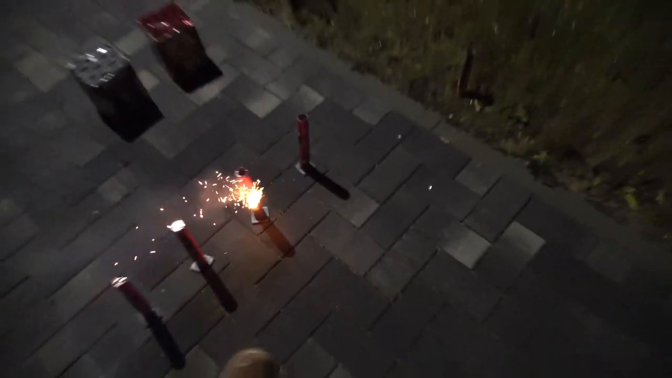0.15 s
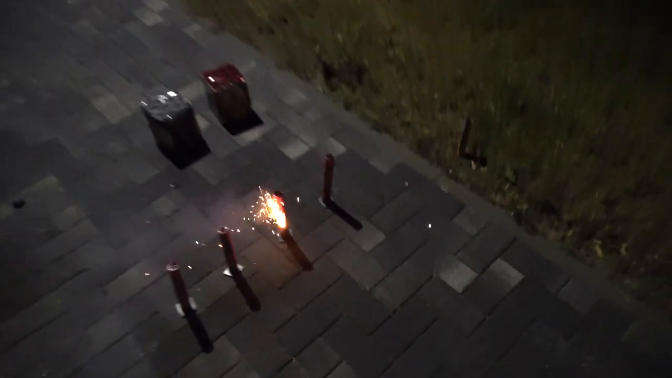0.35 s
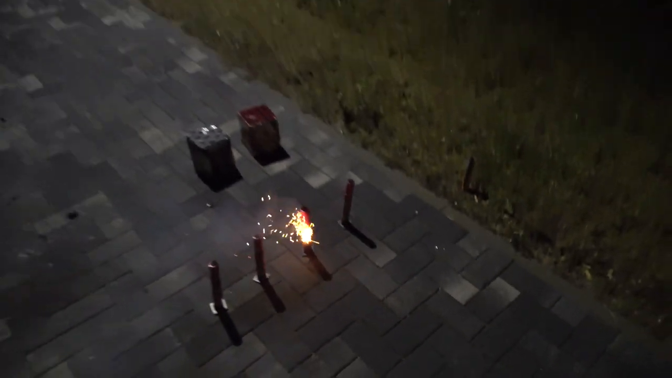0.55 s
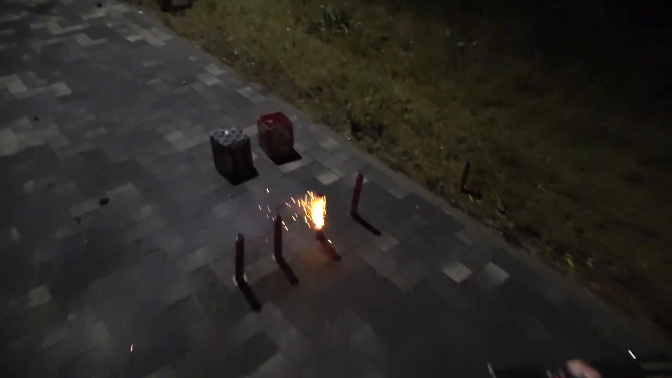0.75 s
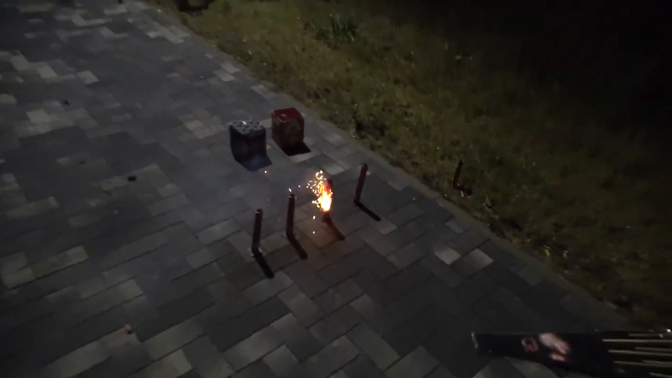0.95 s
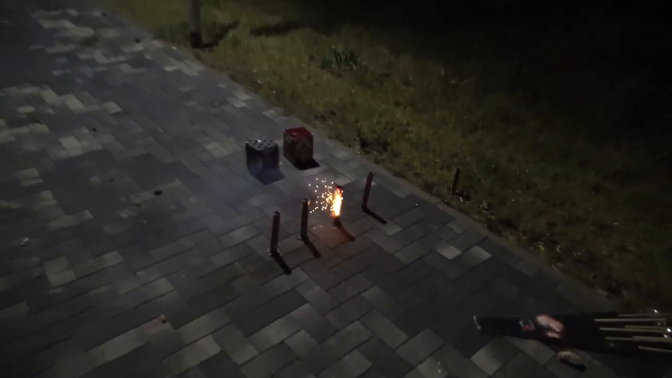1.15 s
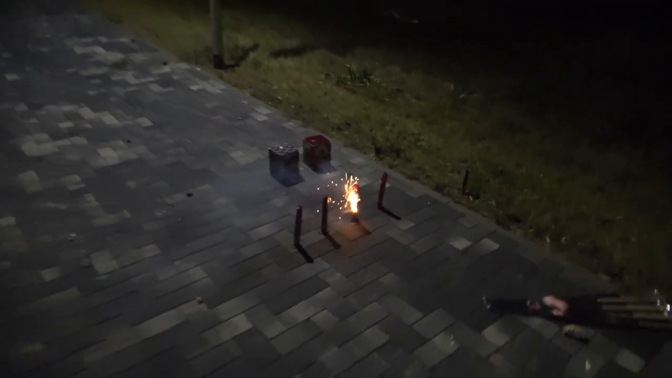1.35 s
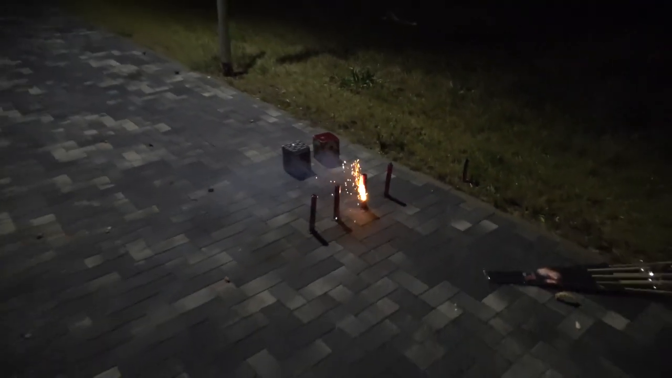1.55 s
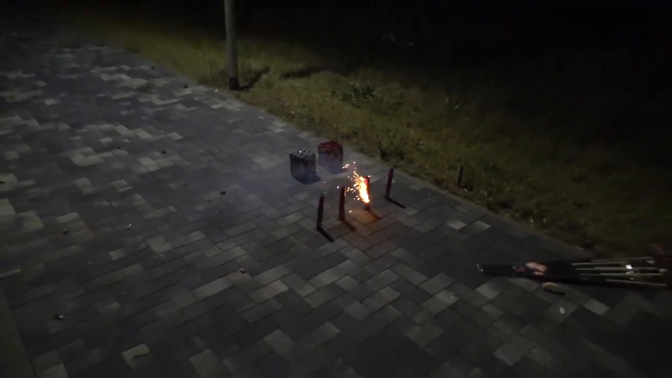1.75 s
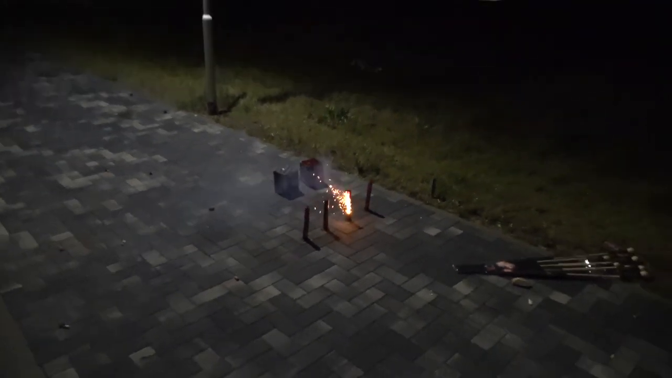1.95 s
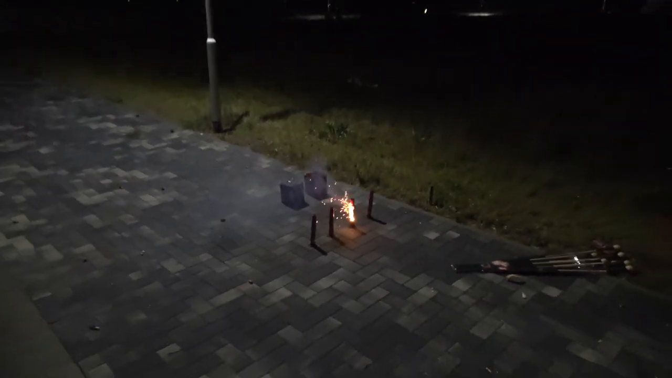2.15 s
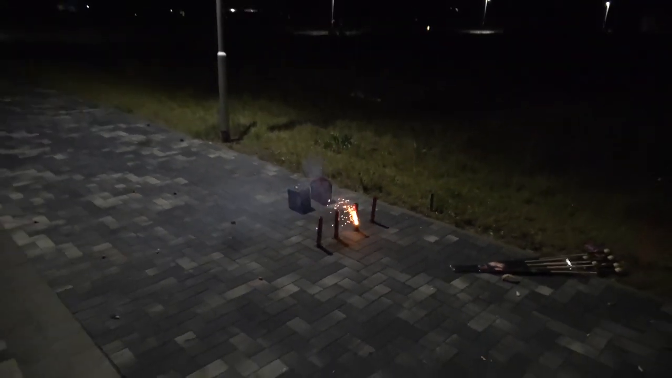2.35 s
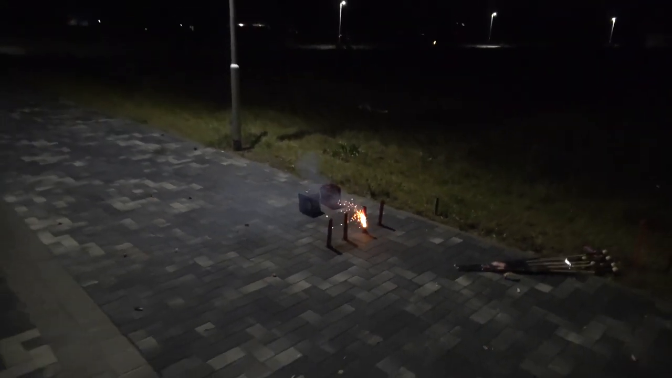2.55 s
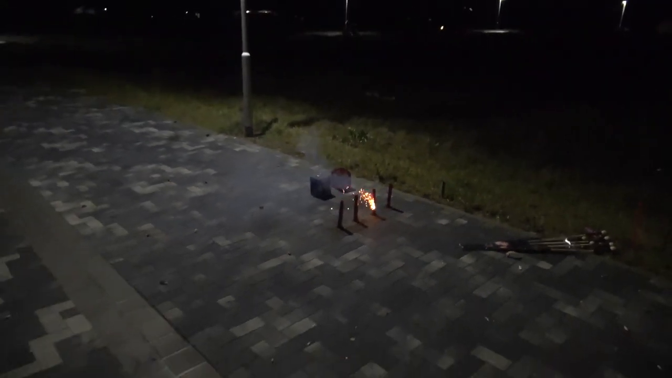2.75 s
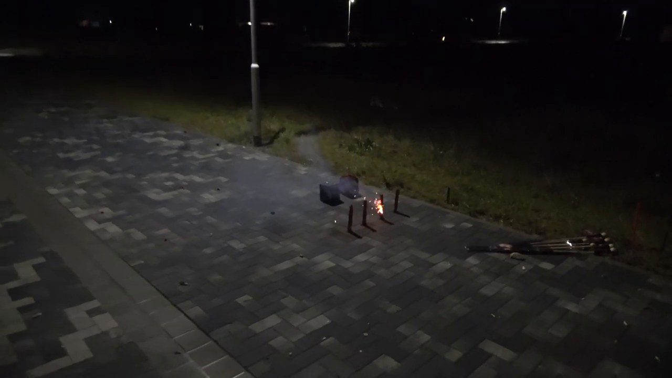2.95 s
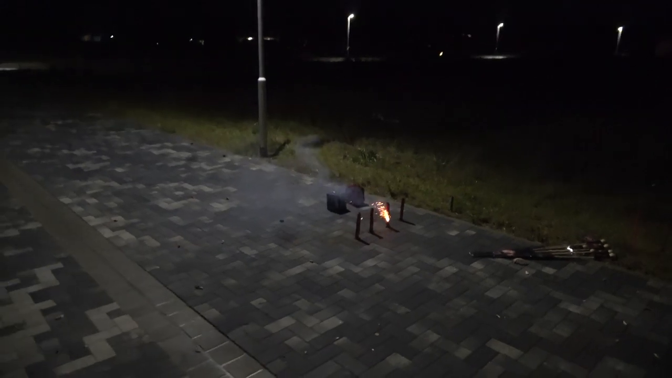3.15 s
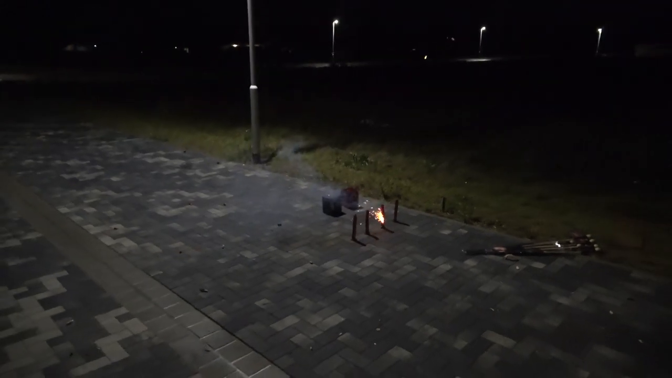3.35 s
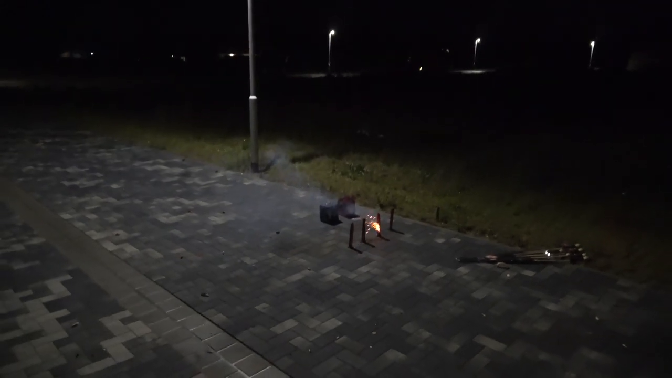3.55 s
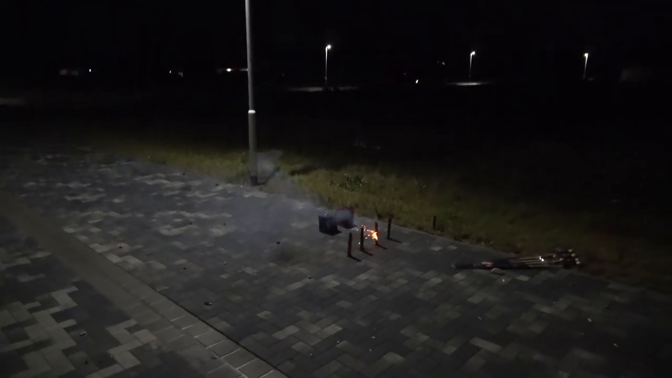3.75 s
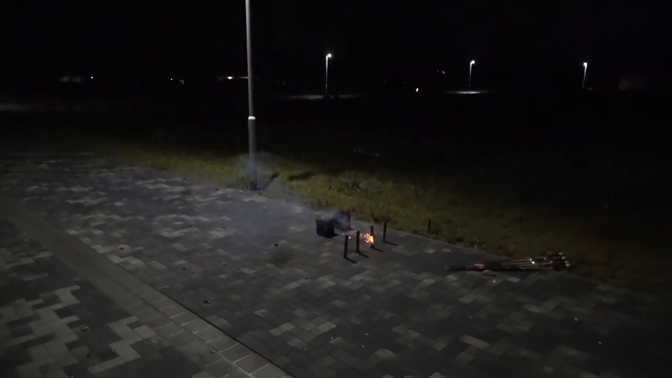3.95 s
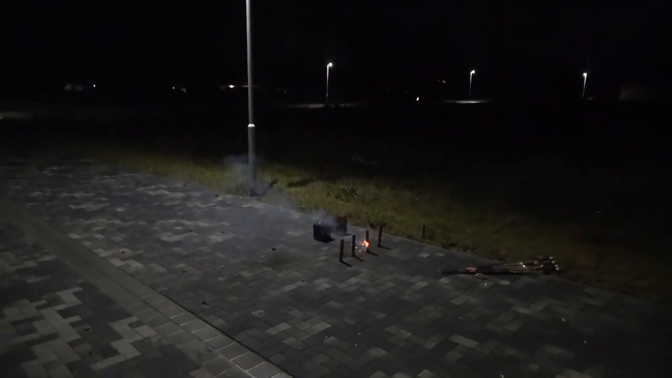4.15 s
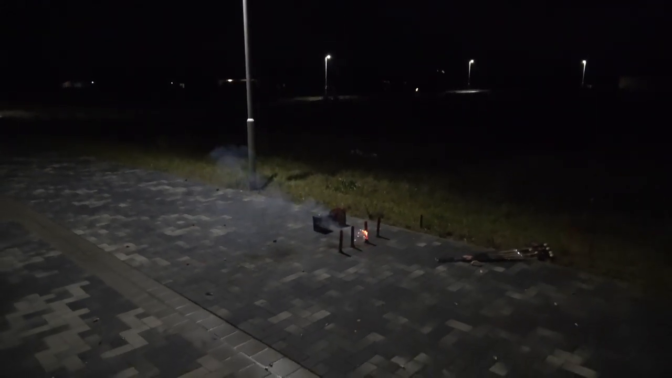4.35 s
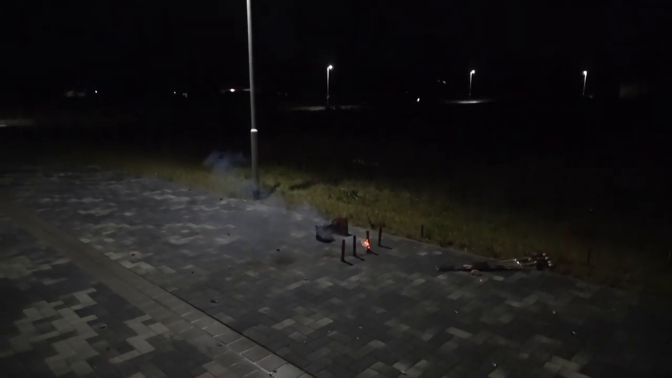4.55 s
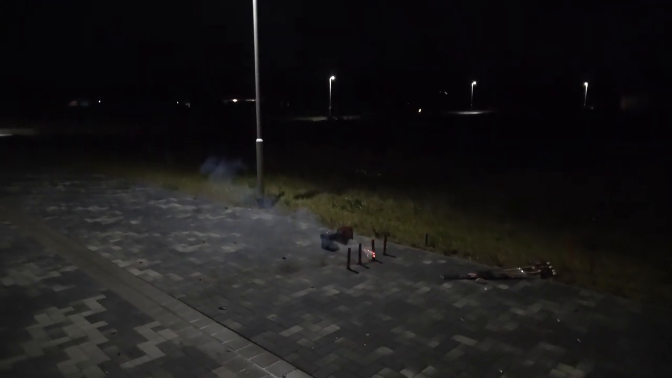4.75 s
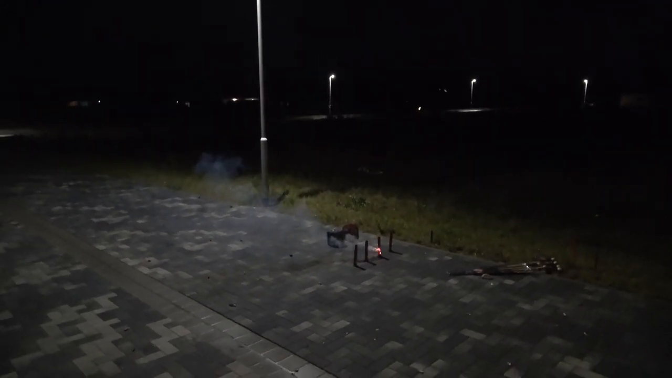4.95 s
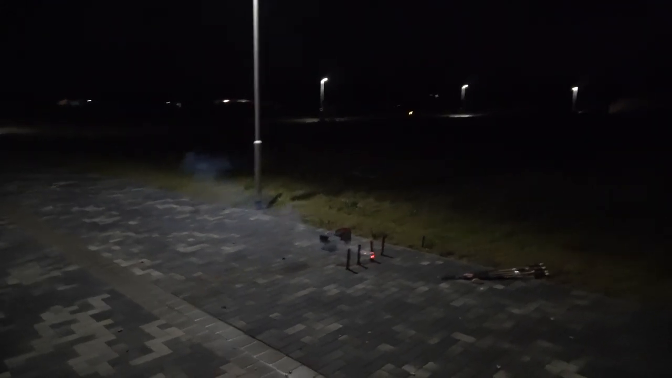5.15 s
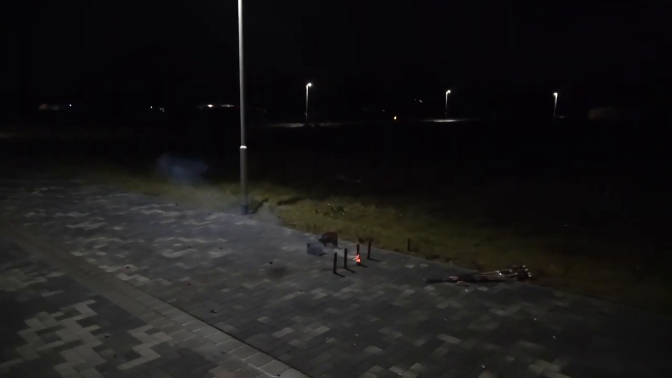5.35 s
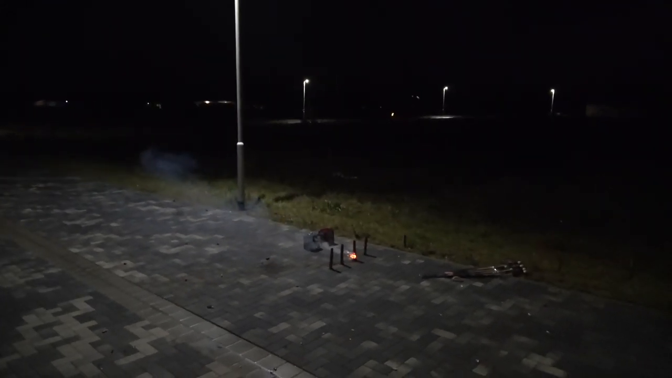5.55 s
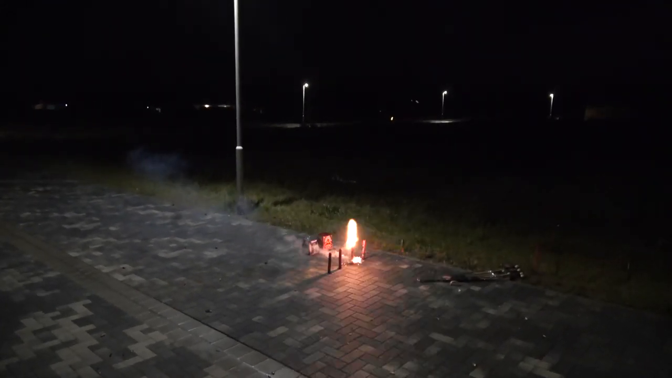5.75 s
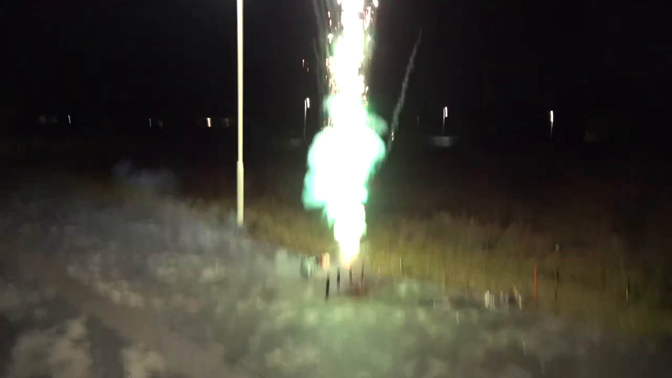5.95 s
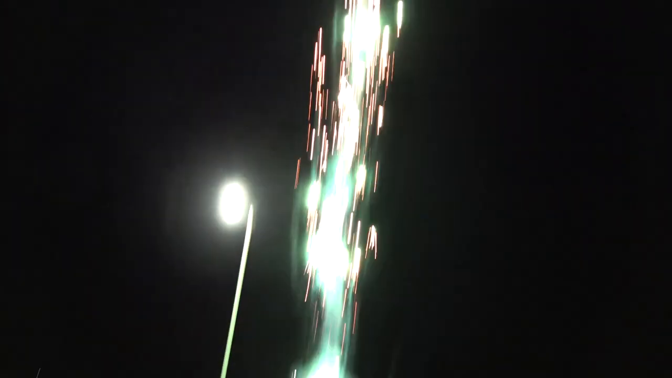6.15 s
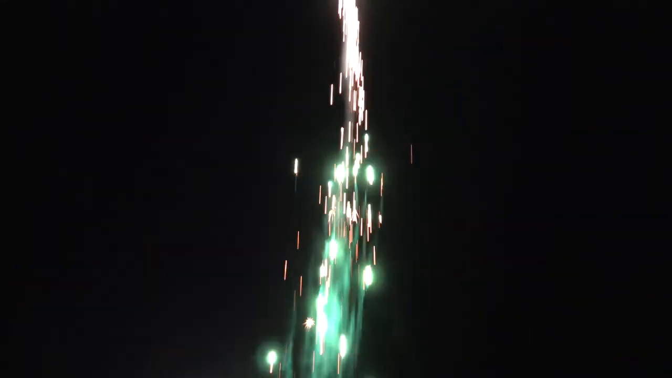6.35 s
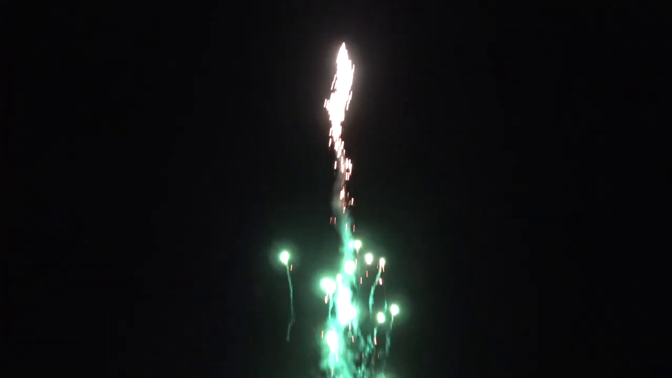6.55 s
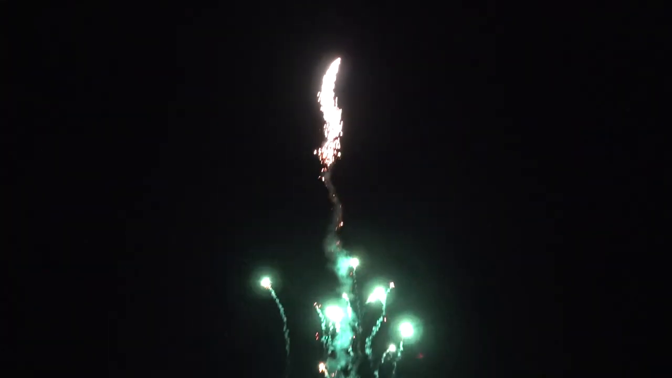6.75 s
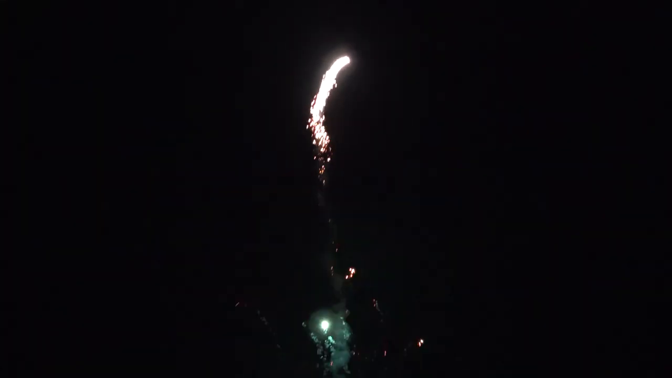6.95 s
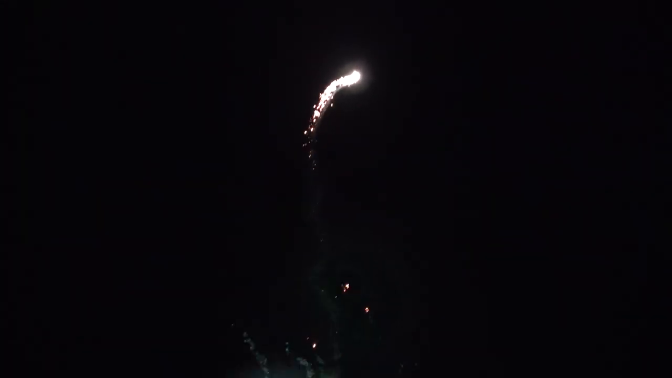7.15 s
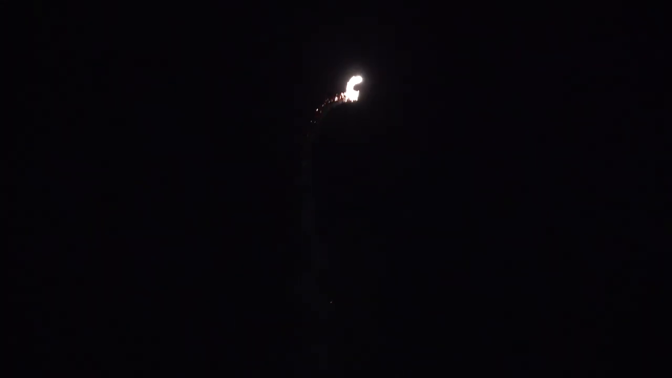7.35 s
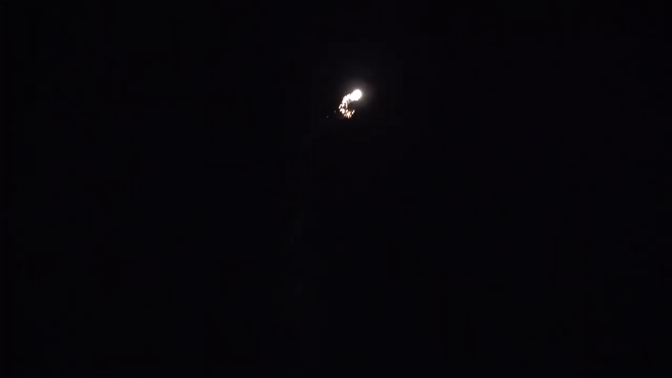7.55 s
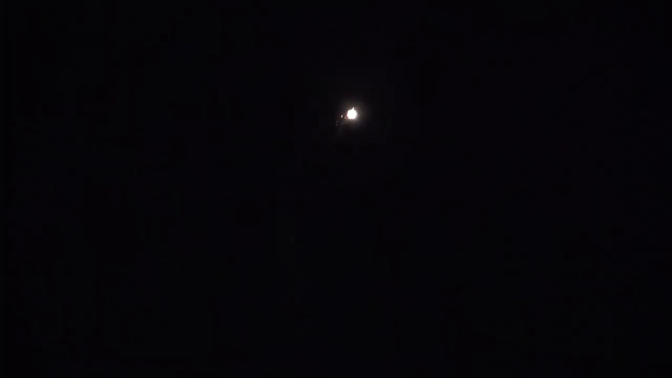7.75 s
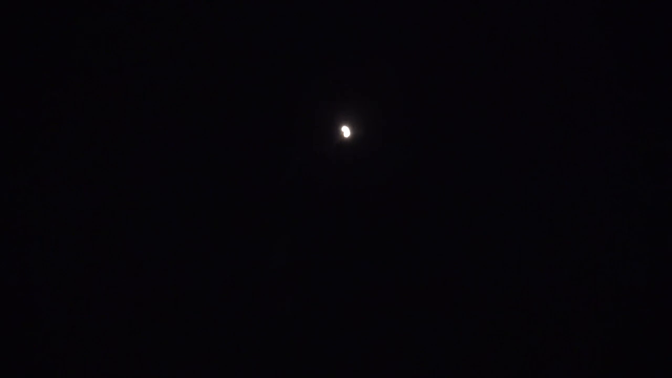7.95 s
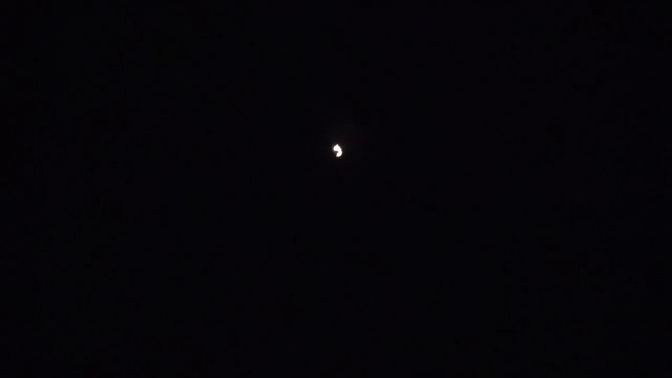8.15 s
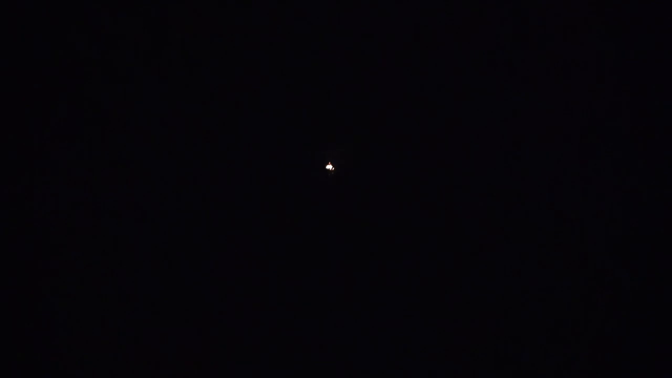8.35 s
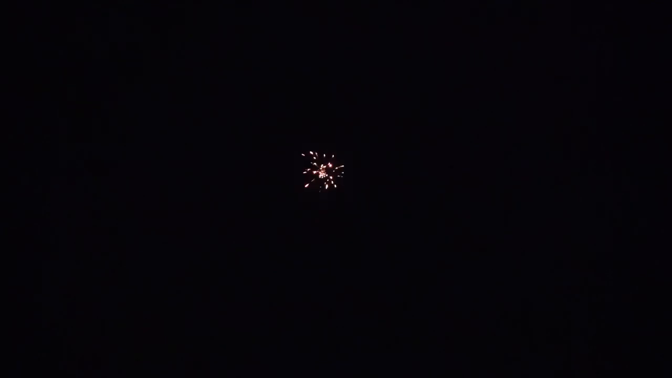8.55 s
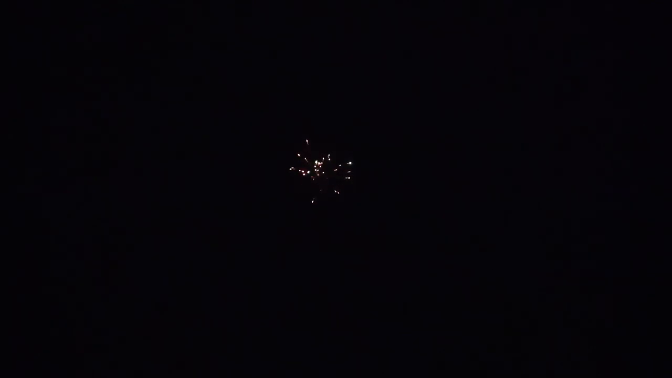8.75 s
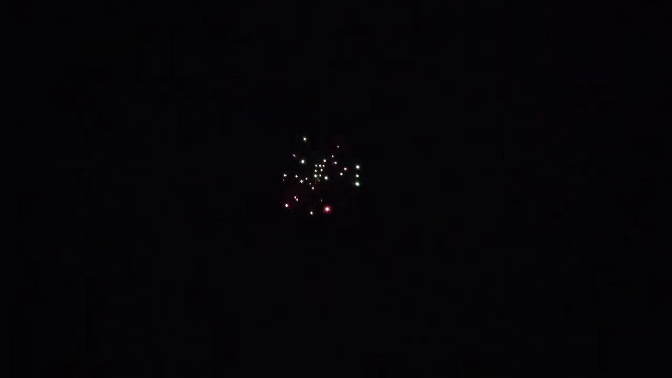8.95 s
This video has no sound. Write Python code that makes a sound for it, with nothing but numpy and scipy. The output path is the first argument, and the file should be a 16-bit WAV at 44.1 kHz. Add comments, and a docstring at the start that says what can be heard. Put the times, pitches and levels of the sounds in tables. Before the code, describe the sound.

A firework fuse hisses and sputters from the start, growing somewhat fainter as the microphone moves away. Gusts of wind rock the microphone with a low, uneven rumble, and soft footsteps thud on gritty paving, with a short scuff at about 5.4 seconds. At about 5.9 seconds the shell launches with a sharp crack and a brief roar, followed by quick popping echoes and a short high squeal. From about 6.2 seconds a loud, raspy howling whistle takes over, sagging in pitch, wavering and growing duller as the shell climbs. It ends with a small squeak at about 8.2 seconds, and a faint echo of the howl lingers while a few sparks snap. At about 8.9 seconds the shell bursts with a very loud, sharp bang, and echoes roll back from the open surroundings.

```python
"""A paved spot on a windy night: a firework's fuse sizzles in its mortar tube while a walker backs away.
The lift charge cracks and the shell howls upward, as burning powder makes its whistle tube sound
a low and a high tone. Sparks snap, the shell bursts, and far surroundings send back the howl and
both blasts as echoes. Gusts rock the microphone and add a low rumble."""
import sys
import numpy as np
from scipy import signal
from scipy.fft import rfft, irfft
from scipy.io import wavfile
from scipy.ndimage import uniform_filter1d, map_coordinates

SR = 44100
rng = np.random.default_rng(int(sys.argv[2]) if len(sys.argv) > 2 else 0)


def int16_out(signal):
    """Quantize to a 16-bit WAV file."""
    q = np.round(np.clip(np.atleast_2d(signal).T, -1, 1) * 32767)
    wavfile.write(sys.argv[1], SR, q.astype(np.int16))


N = 400869
T = np.arange(N) / SR

# the dull rush of night air and far echoes: pitch_hz, level_db
AIR_TONE = [(80, -9), (200, 0), (500, 3.5), (1200, -0.5), (2500, -9), (4000, -12.5), (9000, -35)]
# the rasp of the whistle's flame: pitch_hz, level_db
RASP_TONE = [(300, -27), (800, 12), (1600, -2.5), (4000, -8), (6000, -62.5)]


def undb(db):
    """Turns decibels into a number to multiply by."""
    return 10 ** (np.asarray(db) / 20)


def curve(table, column, outside=None):
    """Joins one column's points with straight lines over time; column 0 holds the seconds."""
    rows = np.array(table, float)
    return np.interp(T, rows[:, 0], rows[:, column], outside, outside)


def colour(x, tone):
    """Makes some pitches louder than others by (pitch_hz, level_db) rows; the result has spread 1."""
    hz, db = np.transpose(tone)
    bin_hz = np.maximum(np.arange(N // 2 + 1) * SR / N, 1)
    shaped = irfft(rfft(x) * undb(np.interp(np.log(bin_hz), np.log(hz), db, -90, db[-1])), N)
    return shaped / shaped.std()


def wander(rate):
    """A smooth random wiggle that changes about rate times a second; spread 1."""
    width = max(int(SR / rate), 2)
    smooth = uniform_filter1d(uniform_filter1d(rng.standard_normal(N), width), width)
    return smooth / smooth.std()


def crackle(spread_db):
    """Noise made of tiny clicks, a few much louder than the rest."""
    return rng.standard_normal(N) * undb(spread_db * np.minimum(rng.exponential(size=N), 5.5))


def swells(table):
    """Smooth bumps of loudness from (centre_s, peak_db, length_s) rows."""
    return sum(undb(db) * np.cos(np.pi * np.clip((T - s) / length, -.5, .5)) ** 2
               for s, db, length in table)


def phase(hz, wobble, rate=90):
    """The running angle of an unsteady tone; wobble is a share of its pitch."""
    return 2 * np.pi * np.cumsum(hz * (1 + wobble * wander(rate))) / SR


def add_hit(out, start_s, db, hz, rise_ms, fade_ms, noise_db=-60):
    """Adds a short tone with a spray of noise; both drop 60 dB in fade_ms."""
    start = int(start_s * SR)
    t = np.arange(min(2000, N - start)) / SR
    shape = (1 - np.exp(-t * 1000 / rise_ms)) ** 2 * undb(-60 * t * 1000 / fade_ms)
    spray = undb(noise_db) * rng.standard_normal(2000)[:len(t)]
    out[start:start + len(t)] += undb(db) * shape * (np.sin(2 * np.pi * hz * t) + spray)


def wind():
    """Swirls of air rock the microphone at a wandering rate, over a gusty rumble and the night air."""
    levels = [(0, -13, -23, -27.5), (.6, -13, -27, -30.5), (1.1, -19.5, -17.5, -29.5),
              (1.35, -27, -22.5, -30.5), (1.8, -18, -30, -27.5), (2.5, -18, -26, -32.5),
              (2.9, -16.5, -35, -33.5), (3.7, -21.5, -34.5, -38.5), (4.3, -13.5, -31, -37.5),
              (4.7, -13.5, -33, -35.5), (5.2, -14, -26, -34), (5.8, -12.5, -29.5, -37),
              (6.1, -29, -33, -34), (6.4, -40, -52, -38.5), (6.8, -38, -58.5, -37.5),
              (7.6, -30, -51.5, -37), (7.9, -33, -40.5, -34), (8.4, -24, -41, -34.5),
              (8.8, -23.5, -47, -43.5), (9.09, -29, -23, -36)]  # the wind's layers: time_s, sway_db, rumble_db, air_db
    gusts = [(.1, 1, 0.24), (.71, -6, 0.23), (.98, -6.5, 0.38), (1.32, -10, 0.12), (1.48, -9.5, 0.49),
             (2.07, -2, 0.34), (2.3, -10.5, 0.26), (2.58, -17, 0.035), (2.8, -10.5, 0.65),
             (3.37, -7.5, 0.59), (3.88, -9.5, 0.14), (4.27, -9, 0.16), (4.6, -27, 0.21), (5.1, -5, .4),
             (5.27, 0.5, 0.29), (5.6, -5.5, 0.25), (5.77, -8.5, .2), (6.08, -13, 0.11), (7.62, -26, 0.18),
             (8.08, -15, 0.18), (8.23, -12, 0.13), (8.38, -11.5, 0.34), (8.62, -12.5, 0.34),
             (8.77, -18, 0.18)]  # single puffs: centre_s, peak_db, length_s
    sway_tone = [(4, -23.5), (9, 2), (16, 4.5), (26, -9), (40, -34), (80, -73)]  # slow swings of air pressure: pitch_hz, level_db
    rumble_tone = [(20, 17.5), (35, 13.5), (60, 1.5), (120, -7), (250, -14), (600, -49)]  # the deep rumble: pitch_hz, level_db
    gust_gain = swells(gusts)
    swirl_hz = 12 * np.exp(0.37 * np.clip(wander(8.95), -1.5, 1.5))
    swirls = np.sin(2 * np.pi * np.cumsum(swirl_hz) / SR) * gust_gain
    sway = colour(rng.standard_normal(N), sway_tone) * undb(curve(levels, 1))
    rumble_gain = undb(curve(levels, 2)) + undb(-35) * gust_gain
    rumble = colour(rng.standard_normal(N), rumble_tone) * rumble_gain * undb(4.4 * wander(16))
    air = colour(rng.standard_normal(N), AIR_TONE) * undb(curve(levels, 3) + 1.44 * wander(9.5))
    return swirls + sway + rumble + air


def far_blasts():
    """Both blasts come back from far away as a dull rush that swells and dies."""
    echoes = [(6.0, -13, 0.15, 0.39), (9.09, -12.5, 0.24, .5)]  # one rush per blast: peak_s, peak_db, rise_s, fade_s (to drop 60 dB)
    gain = sum(undb(db - 60 * np.maximum(T - s, 0) / fade) * np.clip(1 + (T - s) / rise, 0, 1) ** 2
               for s, db, rise, fade in echoes)
    return colour(rng.standard_normal(N), AIR_TONE) * gain


def far_whistle():
    """The howl returns along many paths that add up by chance, so each of its tones flutters."""
    echo = [(8.2, 974, -23), (8.24, 866, -24), (8.46, 900, -28), (8.7, 901, -31.5), (8.87, 902, -37.5),
            (8.9, 885, -45)]  # the returning howl: time_s, pitch_hz, level_db
    harmonics = [(1, 1.5), (2, -19), (3, -14.5), (4, -25.5)]  # its tones: pitch_multiple, level_db
    angle = phase(curve(echo, 1), wobble=0.01)
    tones = sum(undb(db) * (wander(90 * k) * np.sin(k * angle) + wander(90 * k) * np.cos(k * angle))
                for k, db in harmonics)
    hiss = colour(rng.standard_normal(N), RASP_TONE) * undb(np.interp(T, [8.2, 8.5, 8.9], [-8, -12, -16]))
    return (tones + hiss) * undb(curve(echo, 2, -120))


def feet():
    """Soles thud on gritty paving, and one drags in nine quick slips."""
    steps = [(.063, -3, 153, -36), (.173, -1.5, 312, -22.5), (0.268, -5, 265, -16.5),
             (0.711, 1, 296, -28.5), (0.73, 1, 280, -26), (0.869, -2.5, 273, -18.5),
             (1.019, -20.5, 151, -12.5), (1.269, 0.5, 230, -35), (1.315, -2.5, 517, -48),
             (1.418, -8.5, 207, -33.5), (1.826, 5.5, 242, -36), (1.981, -6, 144, -18),
             (2.415, -7, 198, -36), (3.109, 1, 185, -34), (3.339, -9.5, 166, -43.5),
             (3.936, -8.5, 158, -29), (4.304, -14.5, 147, -12), (4.747, -5.5, 270, -29),
             (4.79, -10.5, 239, -21), (5.077, -12, 155, -18)]  # footfalls: start_s, level_db, pitch_hz, grit_offset_db
    grit_tone = [(200, -4.5), (700, -3), (1500, -7.5), (3500, -18), (8000, -31.5)]  # crunching grit: pitch_hz, level_db
    soles, grit = np.zeros(N), np.zeros(N)
    for s, db, hz, grit_db in steps:
        add_hit(soles, s, db, hz, rise_ms=0.89, fade_ms=18)
        add_hit(grit, s, db + grit_db, 0, rise_ms=5.1, fade_ms=45, noise_db=19)
    scuff_s, slip_gap_s, slip_hz = 5.354, .0038, 1620
    for k, (late, size, pitch) in enumerate(rng.standard_normal(size=(9, 3))):
        s, db = scuff_s + slip_gap_s * (k + .15 * late), -2.5 + 2.2 * size
        add_hit(soles, s, db, slip_hz * (1 + .08 * pitch), rise_ms=0.02, fade_ms=8.9)
        add_hit(soles, s, db - 12, 700, rise_ms=0.038, fade_ms=7.9)
        add_hit(grit, s, db - 6, 0, rise_ms=0.086, fade_ms=21, noise_db=-2.5)
    return soles + colour(grit, grit_tone) * grit.std()


def delayed(x, ms):
    """The same sound, ms milliseconds later."""
    return map_coordinates(x, [np.arange(N) - ms * SR / 1000], order=3, mode="nearest")


def fuse():
    """A sputtering hiss; the paving's echo cancels some pitches, which climb as the walker backs off."""
    burn = [(0, -16, 0.56, 0), (.3, -20, 0.5, 0), (.6, -20.5, 0.45, 4), (.9, -20, 0.38, 1.5),
            (1.2, -23, 0.34, 4), (1.5, -20.5, 0.29, 1.5), (1.8, -22, 0.26, 1), (2.1, -24.5, 0.23, 0),
            (2.4, -25, 0.21, 2), (3.0, -24.5, .185, 3.1), (3.3, -21, 0.18, 3), (3.9, -26, 0.18, 2.3),
            (4.1, -28, .15, -3), (4.4, -28.5, 0.14, -2.5), (4.7, -27.5, 0.13, 2.3), (5.3, -25, .11, -7.5),
            (5.6, -23.5, 0.097, -9), (5.86, -26.5, 0.083, 5), (5.9, -19, 0.16, 10)]  # the burning fuse: time_s, level_db, echo_delay_ms, treble_db
    hiss_tone = [(300, -27), (800, -10), (2000, -0.5), (4300, 1), (6400, -5), (8400, 2.5), (10300, -12.5),
                 (13000, -6.5), (15500, -13)]  # its hiss: pitch_hz, level_db
    paving = [(.11, .85, 0.54), (.14, .85, 0.13), (.2, 0.86, .3), (.3, 0.9, 0.42), (.5, 0.7, 0.2)]  # how much bounces back: echo_delay_ms, dull_share, treble_share
    hiss = colour(crackle(2.34) * undb(1.16 * wander(10.3) + 0.88 * wander(53)), hiss_tone)
    dull = uniform_filter1d(uniform_filter1d(hiss, size=3), size=3)
    treble = hiss - dull
    delay_ms = curve(burn, 2)
    ms, dull_share, treble_share = np.transpose(paving)
    dull_echo = np.interp(delay_ms, ms, dull_share) * delayed(dull, delay_ms)
    # the treble bounces off the tops of the stones, a little sooner
    treble_echo = np.interp(delay_ms, ms, treble_share) * delayed(treble, delay_ms - 0.028)
    return (dull + dull_echo + (treble + treble_echo) * undb(curve(burn, 3))) * undb(curve(burn, 1, -120))


def lift():
    """The lift charge roars out of the tube in lumps; nearby walls slap it back as pops."""
    blast = [(5.868, -10), (5.872, -9), (5.875, -2), (5.885, 13), (5.892, -11), (5.925, -17),
             (5.975, -10.5), (6.015, -13), (6.025, -23), (6.062, -21), (6.076, -13.5), (6.09, -22),
             (6.3, -36.5), (6.5, -39)]  # the crack and its roar: time_s, level_db
    roar_tone = [(35, -42), (60, -8), (248, 4), (359, -6), (585, -4.5), (1260, -6), (1480, -3.5),
                 (2910, -8), (3420, -5), (15500, -25.5)]  # the roar: pitch_hz, level_db
    slaps = [(5.903, 3, 720), (5.978, 13, 1540), (5.99, 5, 970), (6.01, 12, 1110), (6.015, 9, 1440),
             (6.039, 7, 993), (6.068, 3, 1370), (6.073, 3, 2600), (6.08, 2, 1470), (6.109, -11, 1170),
             (6.134, -11, 1160), (6.162, -9, 648), (6.17, -6, 1200), (6.202, -17, 258), (6.223, -1, 1240)]  # wall echoes: start_s, level_db, pitch_hz
    pops = np.zeros(N)
    for s, db, hz in slaps:
        add_hit(pops, s, db, hz, rise_ms=0.038, fade_ms=6.7, noise_db=-15)
    roar = colour(crackle(2.6), roar_tone) * undb(curve(blast, 1, -120) + 3.2 * wander(150))
    return roar + uniform_filter1d(pops, size=3)


def burst():
    """Sparks snap, then come the shell's bang, its bounce off the ground and a roll of echoes."""
    sparks = [(8.3644, -25), (8.4692, -18), (8.485, -8), (8.6273, -26), (8.6532, -24), (8.7121, -28),
              (8.767, -18), (8.8009, -20), (8.8348, -21)]  # snaps: start_s, level_db
    # the bang and its bounce: start_s, level_db, pitch_factor, base_hz, rise_ms, fade_ms
    bangs = [(8.8702, 48, -0.863, 537, 0.046, 3.4), (8.8829, 43, 0.98, 520, 2, 3.1)]
    sharp_echoes = [(8.9254, 9, -0.96, 370), (8.9428, 6, 0.72, 525), (8.9666, 7, 0.85, 450),
                    (8.972, -2, 0.89, 513), (9.016, 3, 1, 350)]  # knocks in the roll: start_s, level_db, pitch_factor, base_hz
    roll = [(8.872, -25), (8.89, -28), (8.93, -11), (9.0, -14.5), (9.09, -21)]  # rolling echoes: time_s, level_db
    roll_tone = [(40, -25), (130, -11), (400, -4.5), (700, -6.5), (1200, -21.5), (2500, -16.5), (3500, -27),
                 (5500, -25.5), (8000, -32.5), (15500, -62)]  # their sound: pitch_hz, level_db
    hits = np.zeros(N)
    for s, db in sparks:
        add_hit(hits, s, db, 4000, rise_ms=0.041, fade_ms=0.51)
    # a negative factor turns the wave upside down
    for s, db, factor, hz in sharp_echoes:
        add_hit(hits, s, db, factor * hz, rise_ms=0.33, fade_ms=15)
    for s, db, factor, hz, rise_ms, fade_ms in bangs:
        add_hit(hits, s, db, factor * hz, rise_ms, fade_ms)
    return hits + colour(crackle(4), roll_tone) * undb(curve(roll, 1, -120) + 2 * wander(89))


def flame_noise(roughness, bright_db, fading_s):
    """The whistle's flame rasps more as it burns rougher, and its jet of gas hisses."""
    jet_tone = [(3000, 0), (5000, -5), (8400, -7.5), (10300, -25), (15000, -25)]  # the jet's hiss: pitch_hz, level_db
    rasp_db = np.interp(roughness, [0, 1], [-33.5, -15]) + 0.26 * np.clip(bright_db, -7, 0)
    rasp = colour(crackle(3.9) * undb(0.87 * wander(27)), RASP_TONE) * undb(rasp_db)
    jet_db = -28.5 + 1.7 * roughness * np.maximum(bright_db, -7) - 14 * fading_s
    jet = colour(crackle(3.9) * undb(1.6 * wander(22)), jet_tone) * undb(jet_db)
    # the air soaks up the treble as the shell climbs
    dull = uniform_filter1d(jet, size=4)
    return rasp + dull + (jet - dull) * undb(np.interp(T, [6.5, 8.2], [0, -14]))


def squeal(low, low_gain):
    """The tube's high tone; it mixes with the low one to make tones at their sum and difference."""
    squeals = [
        [(5.9, 3650, -34), (5.92, 3500, -1), (5.94, 3530, -22), (5.975, 3395, -11), (5.995, 3325, -28),
         (6.035, 3350, -24), (6.052, 3305, -7), (6.092, 3245, -1), (6.184, 3224, 0), (6.28, 3260, -16.5),
         (6.32, 3160, -30)],
        [(8.18, 2910, -32), (8.202, 2816, -13.5), (8.238, 2804, -17), (8.262, 2815, -27)],
    ]  # one table for the start, one for burnout: time_s, pitch_hz, level_db
    # the ground returns the climbing shell's squeal at a slightly lower pitch, so it throbs
    throb_hz, dip_s = 36, 6.14
    echo = np.interp(T, [6.075, 6.095, 6.19, 6.23], [0, .85, .85, 0])
    throb = np.abs(1 - echo * np.exp(2j * np.pi * throb_hz * (T - dip_s))) / (1 + echo)
    stutter_db = np.interp(T, [5.99, 6.08], [3.5, .7])  # the flame catches unevenly at first
    wobble = np.interp(T, [5.98, 6.05], [.035, .0015])
    mix_gain = low_gain * np.interp(T, [6.4, 8.1], [1, .3])  # steep wave fronts fade with height
    out = np.zeros(N)
    for table in squeals:
        high = phase(curve(table, 1), wobble, rate=350)
        gain = undb(curve(table, 2, -120) + stutter_db * wander(160)) * throb
        mixed = (undb(-6) * np.sin(high + low) + undb(-9) * np.sin(high - low)
                 + undb(-14) * np.sin(high + 2 * low))
        out += gain * (np.sin(high) + undb(-24) * np.cos(2 * high) * echo + mix_gain * mixed)
    return out


def whistle():
    """Burning powder drives the open tube: a low howl with overtones, flame noise and a high squeal."""
    howl = [(6.17, 1180, 9), (6.2, 1150, -26), (6.29, 1162, -21), (6.32, 1093, -7), (6.415, 968, -5),
            (6.43, 913, -0.3), (6.46, 936, 0), (6.5, 893, 2.5), (6.58, 868, 1.7), (6.72, 840, 3.5),
            (6.87, 843, 2.5), (6.9, 821, 5), (7.09, 818.6, 2.5), (7.22, 812, 3), (7.27, 833, 1.4),
            (7.39, 824, 2), (7.41, 799, 6.5), (7.52, 789, 7), (7.71, 825, 3), (7.86, 788.5, 5.2),
            (7.91, 832, 1.5), (7.98, 836, 0.5), (8.06, 868, -1), (8.13, 857.5, -2.5), (8.155, 888, -2.5),
            (8.17, 983, -15), (8.21, 994, -14), (8.25, 940, -6)]  # the low tone, sagging as the tube burns longer: time_s, pitch_hz, bright_db
    levels = [(6.16, -20), (6.18, -21), (6.2, -7.5), (6.28, -2.5), (6.5, -3), (7.8, -4), (8.17, -2),
              (8.21, -12), (8.25, -31)]  # its loudness: time_s, level_db
    tumble = [(6.4, 0.0019), (7.0, 0.0073), (7.2, 0.0089), (7.5, 0.0047), (8.1, 0.0057)]  # wavering as the shell tumbles: time_s, share_of_pitch
    flame = [(6.18, .7), (6.2, 0), (6.28, 0.3), (6.305, .6), (6.33, 0.36), (6.41, 0.77), (6.44, 0.71),
             (7.9, .98), (7.93, 0.73), (8.13, 0.76), (8.17, 0.6)]  # the flame burns clean, then rough: time_s, roughness (0 to 1)
    harmonics = [(1, 0), (2, -13.5), (3, -18.5), (4, -18), (5, -24.5), (6, -32.5), (7, -43.5)]  # the low tone and its overtones: pitch_multiple, level_db
    doubling = [(6.37, -28.5, 0.069), (8.05, -31, 0.25)]  # moments when every other cycle differs: centre_s, peak_db, length_s
    low = phase(curve(howl, 1) * (1 + curve(tumble, 1) * wander(44)), wobble=0.0072)
    low_gain = undb(curve(levels, 1, -120) + 0.57 * wander(170))
    bright_db, roughness = curve(howl, 2), curve(flame, 1)
    fading_s = np.maximum(T - 6.8, 0)  # overtones and jet fade as the shell climbs
    # cycles come early or late, which blurs the higher overtones most
    shake_rad = np.interp(roughness, [0, 1], [.08, .18]) * np.interp(T, [7, 7.5], [1, 1.4])
    shaky = low + shake_rad * wander(550)
    tones = -np.sin(low)
    for k, db in harmonics[1:]:
        overtone_db = db + (k / 3) ** 0.35 * bright_db - 1.23 * k * fading_s + wander(220)
        tones -= undb(overtone_db) * np.cos(k * shaky)
    noise = flame_noise(roughness, bright_db, fading_s)
    half_pitch = np.sin(low / 2) + .5 * np.sin(low * 3 / 2) + 0.43 * np.sin(low * 5 / 2)
    growl = swells(doubling) * undb(3.8 * wander(60)) * half_pitch
    return low_gain * (tones + noise) + growl + squeal(low, low_gain)


def scene():
    """Adds up all the sources, the same on the left and the right."""
    mix = fuse() + wind() + feet() + lift() + whistle() + far_whistle() + burst() + far_blasts()
    return np.array([mix, mix])


def record(dry):
    """The loudest peaks overload and are flattened, then the highest treble is cut."""
    top_hz = 15720
    treble_cut = signal.ellip(14, .2, 95, top_hz, fs=SR, output="sos")
    return signal.sosfilt(treble_cut, np.clip(dry, -.99, .99))


dry = scene()
out = record(dry)
int16_out(out)
```